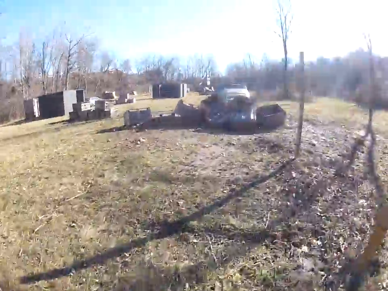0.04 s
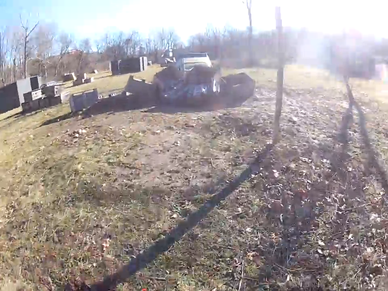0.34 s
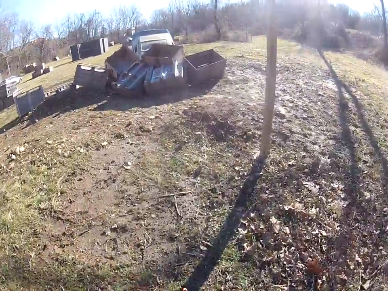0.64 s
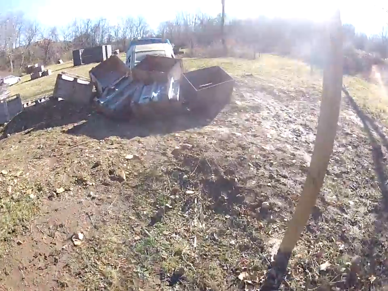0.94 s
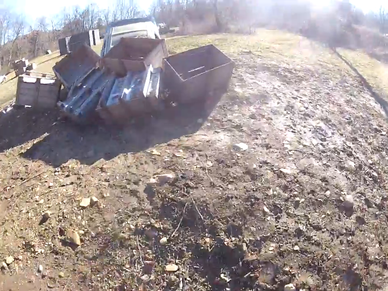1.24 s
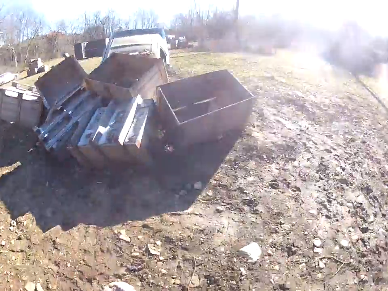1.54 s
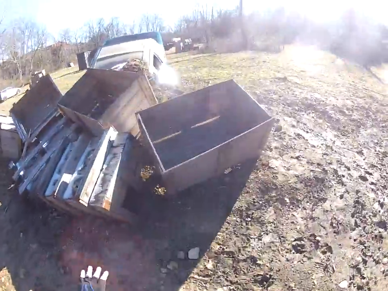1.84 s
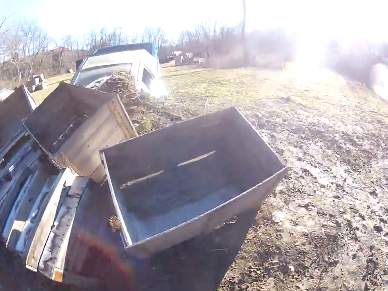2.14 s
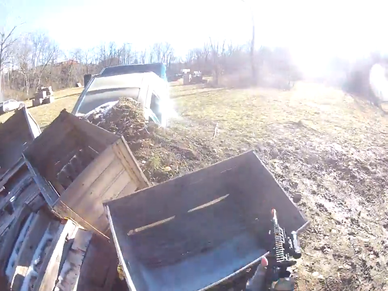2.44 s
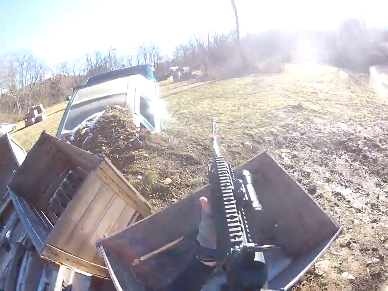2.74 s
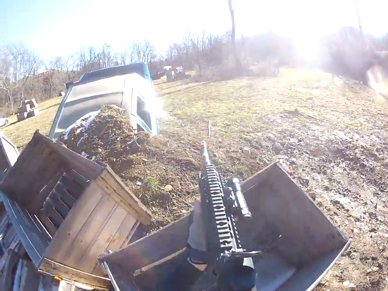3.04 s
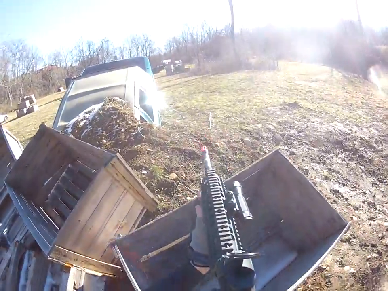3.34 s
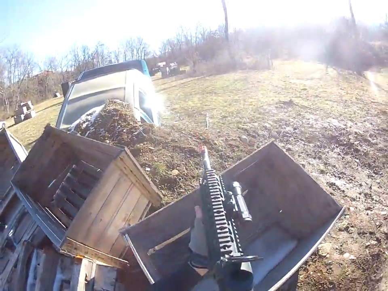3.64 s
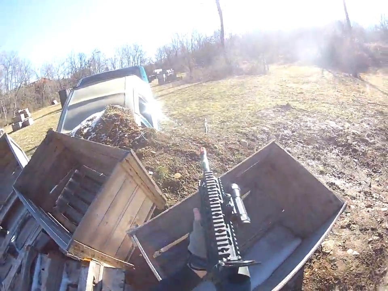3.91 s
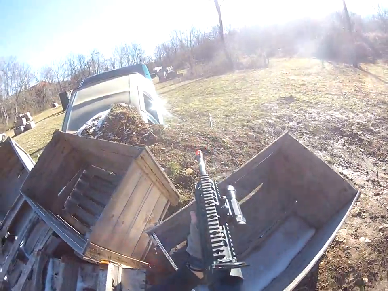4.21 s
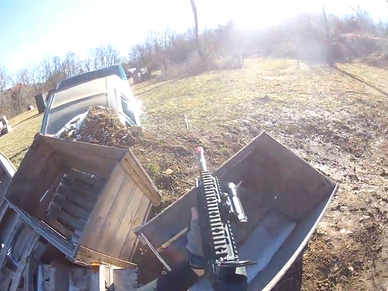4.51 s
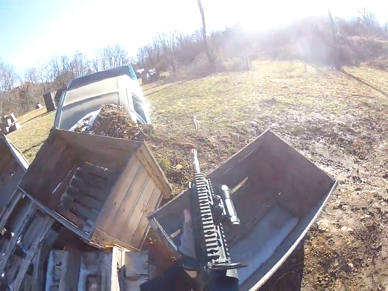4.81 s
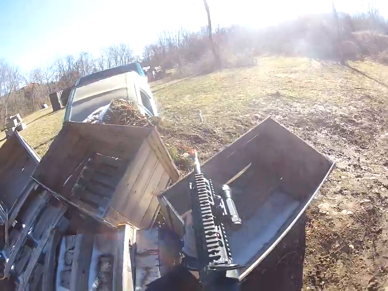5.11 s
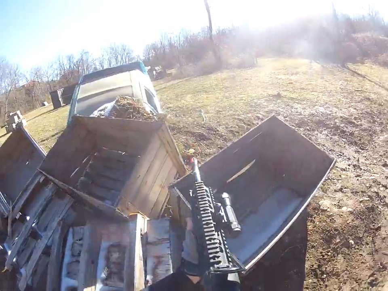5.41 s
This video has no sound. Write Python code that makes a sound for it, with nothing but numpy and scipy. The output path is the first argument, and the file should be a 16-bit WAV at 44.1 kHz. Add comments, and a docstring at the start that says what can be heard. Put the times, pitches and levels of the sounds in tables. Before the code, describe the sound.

Thudding running steps and hollow plastic knocks, followed by a fast, even string of whirring, snapping electric airsoft rifle shots.

```python
"""An electric airsoft rifle fires thirteen single shots from behind some crates, outdoors, close to the mic.
Each time the motor winds the spring through whirring gears and the piston slams home; between shots the
trigger snaps back. First comes the player's run over dry grass and dirt, heard on the one microphone
of a camera carried in a plastic case, while loose gear knocks, rebounds and drags on that case."""
import sys
import numpy as np
from scipy import signal
from scipy.io import wavfile

SR = 44100
rng = np.random.default_rng(int(sys.argv[2]) if len(sys.argv) > 2 else 0)


def inscribe(sig):
    """Save sig as 16-bit PCM at rate SR to the path in sys.argv[1].

    A 1-D sig is mono; a 2-D sig holds one channel per row.
    Samples are clipped to [-1, 1] before scaling.
    """
    pcm = np.round(np.clip(np.atleast_2d(sig).T, -1, 1) * 32767)
    wavfile.write(sys.argv[1], SR, pcm.astype(np.int16))


N = 249606
TIME = np.arange(N) / SR

# the piston hits the cylinder head: t/s
SHOTS = [2.9167, 3.168, 3.3732, 3.572, 3.7722, 3.9836, 4.2015, 4.4117, 4.6124, 4.8254, 5.0321, 5.2508,
         5.461]
# resonances of the rifle's gearbox: f/Hz, width/Hz, level/dB
GEARBOX = [(423, 338, 13), (737, 37, 21), (822, 47, 17), (1370, 450, 7), (1900, 970, 8), (2920, 684, 12),
           (3636, 488, 16)]
# gear knocking on the case: t/s, deep body/dB, shell/dB, hollow ring/dB, hard clack/dB, bright edge/dB
KNOCKS = [(0.1725, 28, 22, 18, 14, 17.0), (0.231, 18, 16, 9, 9, -0.0), (0.355, 29.5, 20.5, 4, 10, 9),
          (0.3817, 30.5, 15, 22, 11, 13), (0.3966, 35.5, 18.5, 28, 19.5, 13),
          (0.417, 6, 15.0, 7.0, 12.5, 12), (0.5259, 19.5, 27.5, -3, 24, 16),
          (0.5506, 21.5, 13, 2.5, -10, -2), (0.5834, 26.5, -3, -1, -9, -2), (0.7, 21.5, -10, -14, -22, -22),
          (0.8806, 35, 27, 18, 11, 19), (0.9687, 22, 13, 12, 13.5, 17), (1.028, 21, -8, -11, -1, -14),
          (1.14, 13, 18, 15, 8.5, 1), (1.158, 32, 13.0, 3, 3, 12), (1.1878, 22, 12.5, 8, 0, 1),
          (1.2182, 16.0, 5, 10, 3.5, -10.5), (1.5765, 27.5, 16.0, 4, -1, 8),
          (1.6004, 34, 21.5, 19, 21.5, 23), (1.616, 29.5, 5, -7, -10, -5), (1.646, 31.5, 9, 0, -11, 9.0),
          (1.9079, 33, 20, 7, 8, 15.5), (1.9415, 34, 22, 21.5, 7, 17), (2.003, 11, 23, 15, 20, 13),
          (2.0943, 11, 8, 7, 0.5, 1.0), (2.1123, 26.5, 17, 11.0, 8, 8), (2.138, 35.5, 9, 24.5, 19, 18),
          (2.16, 23.5, 18.5, 11, 12.5, 10.5), (2.3254, 18, 6, 1, -4, -12.5), (2.577, 10.5, 6, 8, 5, -14),
          (2.6361, 19.5, 18, 15, 13.5, 5), (3.4547, 21.5, 10.5, 5, 13.5, 8),
          (5.518, 19.5, 21.5, 14.0, 16.5, 11.5), (5.6228, 18, 22, 17.5, 18.0, 6)]
# case modes (four body, two shell, hollow ring, clack, three edge, contact snap): f/Hz, width/Hz, level/dB
CASE = [(356, 20, -13), (532.6, 74.6, -1), (716, 102, -4), (840, 48.7, -3.5), (1135, 142, 1.5),
        (1382, 86, 0.5), (1795, 114, -0.8), (2472, 206, 3.5), (2830, 190, 0.4), (3033, 142, 1.2),
        (3820, 123, -7), (4550, 740, -19)]
# the heaviest footfalls, reaching the mic through the body: t/s, level/dB
FOOTFALLS = [(0.202, 27.5), (0.399, 27), (1.272, 26), (1.548, 24.5), (1.599, 31)]


def piston(recoil_db, rock_db, rock_hz, rock_width_hz, rush_db, slam_db, rattle_db):
    """The spring kicks the rifle, air spits through the nozzle, the piston strikes the cylinder head."""
    # modes rung by the slam: f/Hz, width/Hz, level/dB
    slam_modes = [(286, 45, 33), (574, 66, 36.1), (696, 26.3, 35.3), (892, 145, 26.4), (1336, 87, 23.3),
                  (1870, 200, 20.9), (2305, 290, 23.8), (3030, 78, 25.3)]
    # modes rung by the spring's release: f/Hz, width/Hz, level/dB
    recoil_modes = [(285.5, 66, 18.7), (460, 1200, 22.8), (705, 31, 16)]
    shots = np.array(SHOTS)
    puff_times = shots - .003
    luck = rng.standard_normal((len(shots), 2))
    release = clicks(shots - .0125, recoil_db)
    kick = resonate(cut(release, 315, "low"), recoil_modes)
    # the slow push of the spring rocks the whole rifle against the shoulder
    rock = resonate(cut(release, 95, "low"), [(rock_hz, rock_width_hz, rock_db)])
    puff = clicks(puff_times, rush_db + 2 * luck[:, 0])
    air = resonate(puff + .5 * scuff(puff, lead_s=.000066, fade_s=.0062), [(3890, 430, 0)])
    blow = clicks(shots, slam_db + .5 * luck[:, 1])
    # loose parts buzz only in the treble, so the low ring is alike from shot to shot
    buzz = cut(from_db(rattle_db) * scuff(blow, lead_s=.016, fade_s=.011), 1350, "high")
    # the air cushion stirs the lowest mode just before the blow
    cushion = resonate(clicks(puff_times, slam_db), slam_modes[:1])
    # the low ring starts weaker and grows as the rifle settles in the shoulder
    first_ring_db, settling_s = -1.5, 1
    settling_db = first_ring_db * np.exp(-(shots - shots[0]) / settling_s)
    boom = clicks(shots, slam_db + settling_db + .85 * rng.standard_normal(len(shots)))
    # the two strongest modes start in step and beat
    low_ring = resonate(boom, slam_modes[1:2]) + resonate(boom, slam_modes[2:4])
    high_ring = resonate(blow + buzz, slam_modes[4:])
    return air - kick - rock - cushion + low_ring + high_ring


def motor_cycle(since):
    """Turning rate (Hz) and whirr gain at times from the slam: spin up, sag, run free, brake."""
    wind_s, coast_s = .084, .089   # running time before and after the slam
    spin_up_s, brake_s = .025, .072
    no_load_hz, sag_hz_per_s = 669, 540   # the tightening spring slows the motor
    running_s = np.maximum(since + wind_s, 0)
    speed = (1 - np.exp(-running_s / spin_up_s)) * np.clip((coast_s - since) / brake_s, 0, 1)
    sag_hz = sag_hz_per_s * np.where(since < 0, running_s, since)
    free = (since > -.0081) & (since < .025)   # the gears go quiet while they have let go of the piston
    whirr = from_db(-3 - 12 * free) * speed ** 1.22
    return speed * (no_load_hz - sag_hz), whirr


def gears(grind_db, whine_db, rough_db):
    """The motor runs once for each shot, and the gear teeth whine and grind."""
    # whine of motor and teeth: multiple of the turning rate, level/dB
    partials = [(6, 2.5), (9, 2)]
    shots = np.array(SHOTS)
    nearest = np.argmin(abs(TIME[:, None] - shots + .01), axis=1)
    turns_hz, whirr = motor_cycle(TIME - shots[nearest])
    # play between the teeth makes the rate stagger and each partial flutter
    stagger = 1 + .022 * drift(200) + .018 * drift(6)
    phase = 2 * np.pi * np.cumsum(turns_hz * stagger) / SR
    whine = sum(from_db(db) * (1 + .35 * drift(150)) * np.sin(k * phase) for k, db in partials)
    # the pinion runs slightly off centre, so the grinding throbs once a turn
    grind = (1 + .5 * np.sin(phase)) * rng.standard_normal(N)
    roughness = from_db(rough_db * drift(91))
    return whirr * roughness * (from_db(grind_db) * grind + from_db(whine_db) * whine)


def ratchet(level_db):
    """Ratchet and gears catch at the same points of every cycle, each with a short rattle."""
    # catches within a cycle: t/s from the slam, level/dB, low-pass f/Hz
    catches = [(-.057, -15, 6000), (-.0275, -15, 2000), (-.0135, -5, 1580), (.004, 0.5, 4000),
               (0.028, -8.5, 4470)]
    out = 0
    for delay, db, top_hz in catches:
        luck = rng.standard_normal((len(SHOTS), 2))
        hits = clicks(np.array(SHOTS) + delay + .0017 * luck[:, 0], level_db + db + 2 * luck[:, 1])
        out = out + cut(scuff(hits, lead_s=.0009, fade_s=.0021), top_hz, "low")
    return out


def trigger(rattle_db, grip_hz, grip_db):
    """The trigger snaps back, rattles against the gearbox and faintly sets the hollow grip ringing."""
    # trigger returns: t/s
    resets = [2.998, 3.282, 3.686, 3.868, 4.092, 4.317, 4.525, 4.728, 4.939, 5.145, 5.360, 5.564]
    snaps = clicks(resets, rng.standard_normal(len(resets)))
    rattle = from_db(rattle_db) * scuff(snaps, lead_s=.00064, fade_s=.0022)
    grip = resonate(cut(snaps, 810, "low"), [(grip_hz, 80, grip_db)])
    return resonate(rattle, GEARBOX) + grip


def knocks(level_db, skid_db):
    """Gear skids and lands on the case, right at the mic; the spot it hits sets each mode's strength."""
    size, spot_spread_db = 4096, 2
    blow = signal.unit_impulse(size, "mid")
    out = np.zeros(N + size)
    for s, body, shell, hollow, clack, edge in KNOCKS:
        strengths = np.array([body] * 4 + [shell] * 2 + [hollow, clack] + [edge] * 3 + [max(clack, edge)])
        strengths = strengths + spot_spread_db * rng.standard_normal(len(CASE))
        modes = [(hz, width, db + more) for (hz, width, db), more in zip(CASE, strengths)]
        skid = from_db(skid_db) * scuff(blow, lead_s=.00025, fade_s=.0017)
        at = round(s * SR)
        out[at:at + size] += resonate(from_db(level_db) * (blow + skid), modes)
    return out[size // 2:size // 2 + N]


def bumps(level_db, soft_hz):
    """Padded contacts and hard landings stir only the low modes of the case."""
    # soft bumps against the case: t/s, level/dB
    contacts = [(.113, 6), (0.155, 18.5), (2.245, 19), (2.253, 19), (5.6, 16), (5.645, 16)]
    # low modes of the case: f/Hz, width/Hz, level/dB
    low_modes = [(188.6, 20.4, 11), (332, 40, 6.5)]
    pushes = clicks(*np.transpose(contacts)) + from_db(-15.5) * clicks(*np.transpose(FOOTFALLS))
    return resonate(cut(from_db(level_db) * pushes, soft_hz, "low"), low_modes)


def dragging(drag_db, lead_s, fade_s):
    """Heavy gear scrapes grittily over the case around each knock; light, hard gear strikes cleanly."""
    # gear sliding along the case without a clear knock: t/s, level/dB
    scrapes = [(0.197, 19), (0.570, 15)]
    s, body, shell, *_ = np.transpose(KNOCKS)
    clean_db = np.minimum(body - shell - 10, 0)
    drags = scuff(clicks(s, body + clean_db + drag_db), lead_s, fade_s)
    slides = scuff(clicks(*np.transpose(scrapes)), lead_s=.0069, fade_s=.0069)
    grit = rms_one(grains(per_s=4100, spread_db=0)[0]) * (drags + slides)
    return resonate(cut(grit, 1270, "low"), CASE[:-1])


def footfalls(level_db, body_hz, width_hz, soft_hz):
    """Each hard landing, and more lightly each knock, jolts the camera with one deep, damped thud."""
    s, body, *_ = np.transpose(KNOCKS)
    jolts = clicks(*np.transpose(FOOTFALLS)) + clicks(s, body - 9)
    return resonate(cut(from_db(level_db) * jolts, soft_hz, "low"), [(body_hz, width_hz, 0)])


def running(thud_db, rub_db, crunch_db, flutter_db):
    """Rumble carried through the body, cloth rubbing near the mic, dry stalks snapping underfoot."""
    # the run: t/s, body rumble/dB, rubbing of clothes and straps/dB, crunch of grass/dB
    stride = [(0.0, -41.5, -33.5, -39), (0.95, -50, -39.5, -42.5), (1.2, -50, -36.5, -43),
              (1.39, -43.5, -36, -39.5), (1.45, -54, -40, -47.5), (1.8, -52, -45, -44),
              (2.0, -49, -35, -41), (2.22, -52, -42, -46.5), (2.6, -50, -39, -43.5),
              (2.8, -53, -46.5, -47.5)]
    # spectra of the rumble, the cloth and the grass: f/Hz, level/dB per Hz
    thud_spectrum = [(20, -4.5), (85, 1.5), (150, -2), (280, -8.5)]
    rub_spectrum = [(130, 1.5), (200, -16), (330, 4), (420, 0.5), (560, 4), (780, -6), (1000, -21),
                    (1300, -16), (1700, -46)]
    crunch_spectrum = [(1300, 1), (2800, 8), (4000, 1), (5800, -8)]
    # after the run the player stands and aims, then moves off
    aiming_db, moving_off_db = (-49.5, -47, -47.5), (-42.5, -31, -51)
    thud, rub, crunch = in_time([*stride, (2.47, *aiming_db), (5.52, *aiming_db), (N / SR, *moving_off_db)])
    rumble = from_db(thud + thud_db) * coloured(thud_spectrum, rng.standard_normal((2, N)))
    cloth_gain = from_db(rub + rub_db + flutter_db * drift(43))
    cloth = coloured(rub_spectrum, grains(per_s=4700, spread_db=5))
    grass_gain = from_db(crunch + crunch_db + flutter_db * drift(41))
    grass = coloured(crunch_spectrum, grains(per_s=16000, spread_db=1.5))
    return rumble + cloth_gain * cloth + grass_gain * grass


def twigs(level_db, hz, width_hz):
    """A thin dry twig breaks underfoot with one tiny bright tick."""
    # twigs snapping: t/s, level/dB
    snaps = [(0.677, -20), (1.041, -7)]
    s, db = np.transpose(snaps)
    return resonate(scuff(clicks(s, db + level_db), lead_s=.0001, fade_s=.00072), [(hz, width_hz, 0)])


def from_db(db):
    """Decibels to gain."""
    return 10 ** (np.asarray(db) / 20)


def rms_one(x):
    """Scale to unit power."""
    return x / np.sqrt(np.mean(x ** 2) + 1e-20)


def in_time(rows):
    """Each column of a curve, sample by sample."""
    s, *columns = np.transpose(rows)
    return [np.interp(TIME, s, c) for c in columns]


def drift(rate_hz):
    """Slow random wander with spread 1."""
    hop, warm_up = 40, 2000
    r = np.exp(-2 * np.pi * rate_hz * hop / SR)
    noise = rng.standard_normal(N // hop + warm_up + 2)
    slow = signal.lfilter([1], [1, -2 * r, r * r], noise)[warm_up:]
    return np.interp(np.arange(N) / hop, np.arange(len(slow)), rms_one(slow))


def clicks(times, db):
    """One impulse at each time."""
    out = np.zeros(N)
    np.add.at(out, np.clip(np.round(np.asarray(times) * SR).astype(int), 0, N - 1), from_db(db))
    return out


def cut(x, hz, kind):
    """Second-order low-pass or high-pass."""
    return signal.sosfilt(signal.butter(2, hz, kind, fs=SR, output="sos"), x + 1e-18)


def resonate(x, modes):
    """Parallel resonances (f/Hz, width/Hz, level/dB), neighbours in opposite sign."""
    out = 0
    for k, (hz, width, db) in enumerate(modes):
        r = np.exp(-np.pi * width / SR)
        poles = [1, -2 * r * np.cos(2 * np.pi * hz / SR), r * r]
        gain = (-1) ** k * from_db(db) * (1 - r * r) / 2
        out = out + gain * signal.lfilter([1, 0, -1], poles, x + 1e-18)
    return out


def scuff(hits, lead_s, fade_s):
    """Rough contact that swells before each hit and dies after it, with the same energy as the hit."""
    rise, fall = np.exp(-1 / (lead_s * SR)), np.exp(-1 / (fade_s * SR))
    power = hits ** 2 + 1e-18
    before = signal.lfilter([1], [1, -rise], power[::-1])[::-1]
    after = signal.lfilter([1], [1, -fall], power)
    return np.sqrt((before + after) / ((lead_s + fade_s) * SR)) * rng.standard_normal(len(hits))


def coloured(spectrum, sources):
    """Half-octave bands fed in turn by two unrelated sources; rms 1."""
    hz, db = np.transpose(spectrum)
    edges = np.geomspace(hz[0], hz[-1] * 1.1, int(2 * np.log2(hz[-1] / hz[0])) + 2)
    out = 0
    for k, (low, high) in enumerate(zip(edges, edges[1:])):
        band = signal.sosfilt(signal.butter(2, [low, high], "band", fs=SR, output="sos"), sources[k % 2])
        out = out + band * from_db(np.interp(np.log(low * high) / 2, np.log(hz), db))
    return rms_one(out)


def grains(per_s, spread_db):
    """Two streams of tiny random snaps of uneven size."""
    sizes = from_db(spread_db * np.minimum(rng.exponential(1, (2, N)), 4))
    return (rng.random((2, N)) < per_s / SR) * sizes * rng.choice([-1, 1], (2, N)) + 1e-18


def scene():
    """Open air, with rifle, case and runner all close to the one microphone."""
    runner = running(thud_db=8, rub_db=1.5, crunch_db=-5, flutter_db=2.5)
    runner += footfalls(level_db=1, body_hz=80, width_hz=41.5, soft_hz=300)
    runner += twigs(level_db=4, hz=5400, width_hz=1800)
    case = knocks(level_db=1, skid_db=-11.5) + bumps(level_db=1.5, soft_hz=690)
    case += dragging(drag_db=-14, lead_s=.0047, fade_s=.0047)
    drive = gears(grind_db=-28.5, whine_db=-40, rough_db=2.02) + ratchet(level_db=1.5)
    rifle = resonate(drive, GEARBOX) + trigger(rattle_db=-10, grip_hz=708, grip_db=19.5)
    rifle += piston(recoil_db=2.5, rock_db=34, rock_hz=114, rock_width_hz=30,
                    rush_db=20, slam_db=-2.5, rattle_db=-5.5)
    return np.tile(rifle + case + runner, (2, 1))


def record(dry):
    """The camera samples at 12 kHz and holds each value, mirroring the sound into a metallic treble."""
    input_top_hz, output_top_hz = 6300, 15350
    dull = signal.sosfilt(signal.butter(8, input_top_hz, fs=SR, output="sos"), dry)
    sampled = signal.resample_poly(dull, 40, 147, axis=1)
    steps = np.repeat(sampled, 4, axis=1)
    held = signal.resample_poly(steps, 147, 160, axis=1)[:, :N]   # from 48 kHz back to SR
    rounded = 1.218 * np.tanh(held / 1.317)
    return signal.sosfilt(signal.ellip(10, .2, 80, output_top_hz, fs=SR, output="sos"), rounded)


dry = scene()
out = record(dry)
inscribe(out)
```